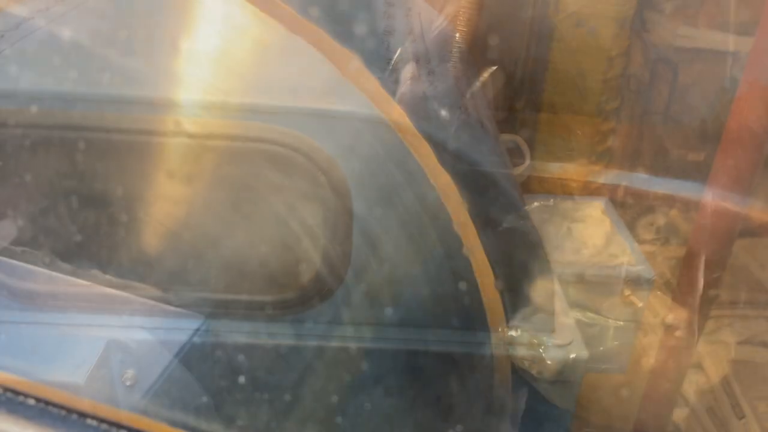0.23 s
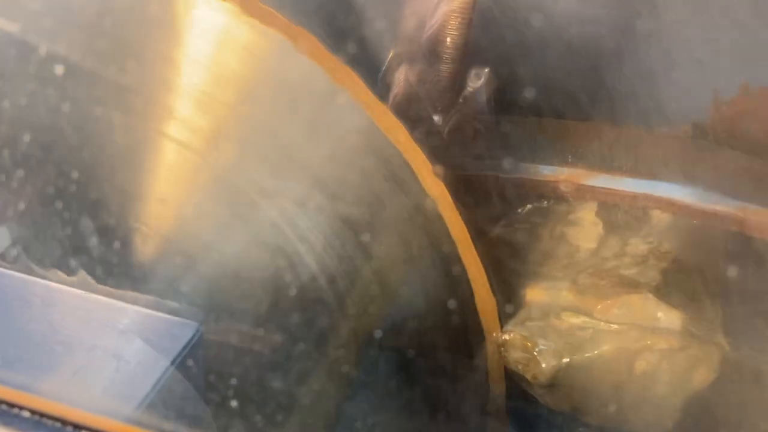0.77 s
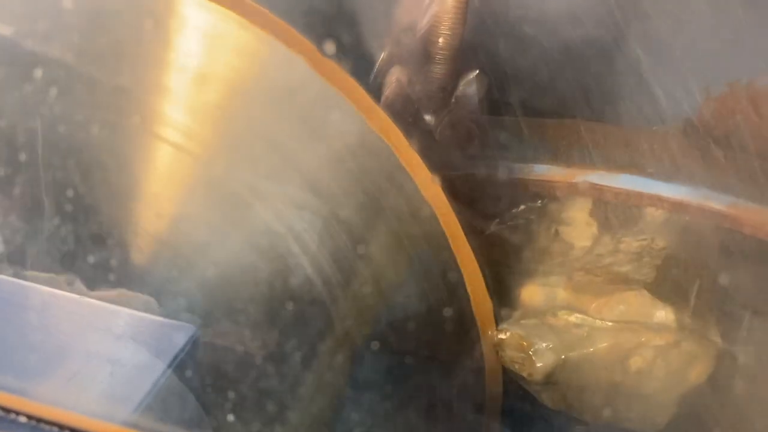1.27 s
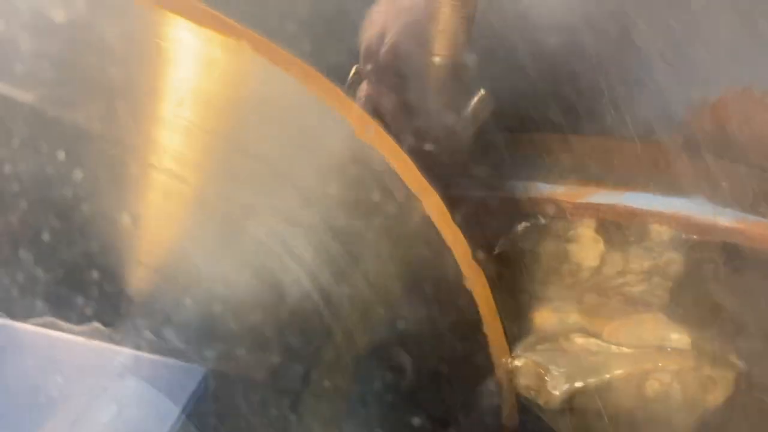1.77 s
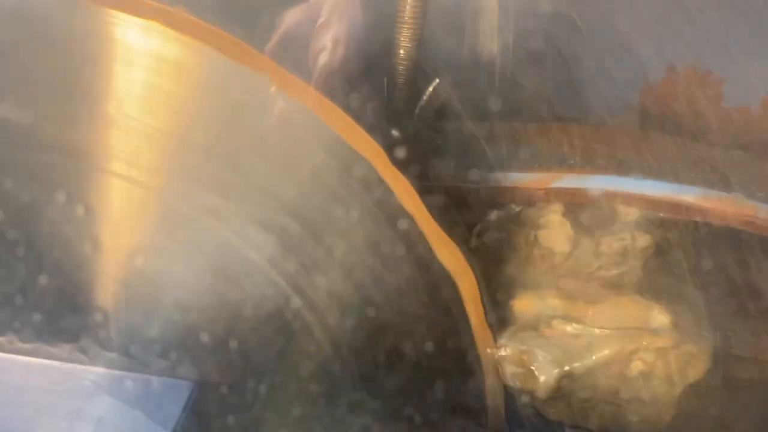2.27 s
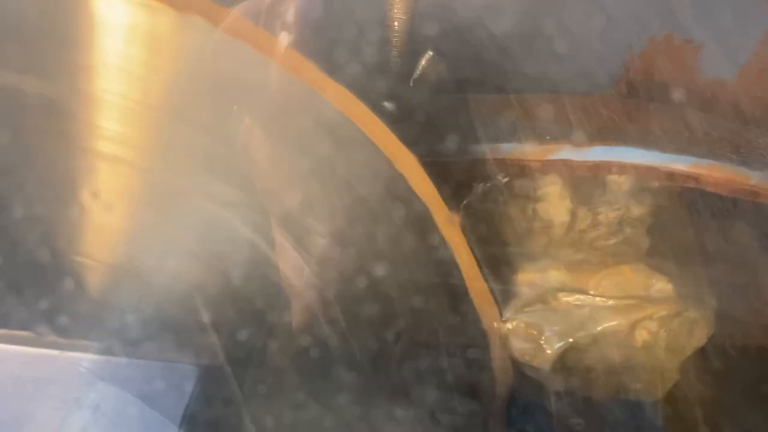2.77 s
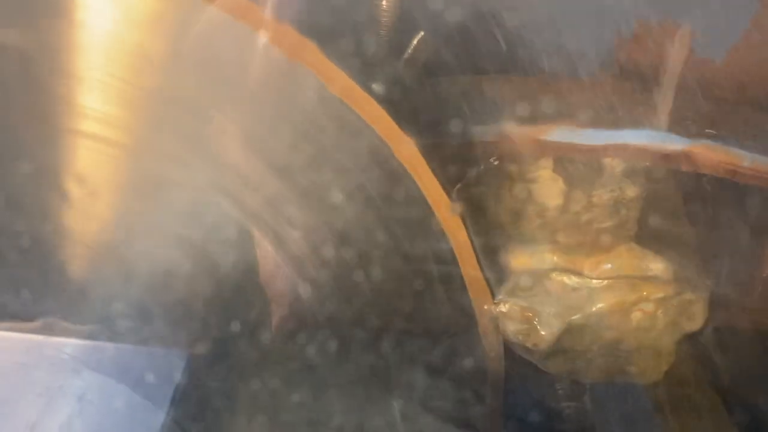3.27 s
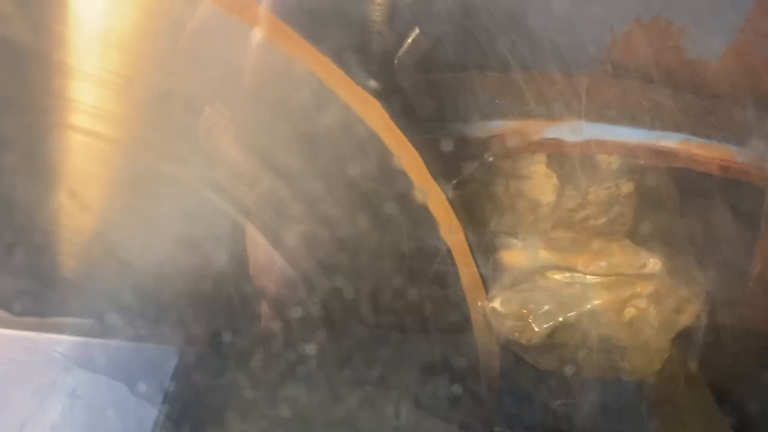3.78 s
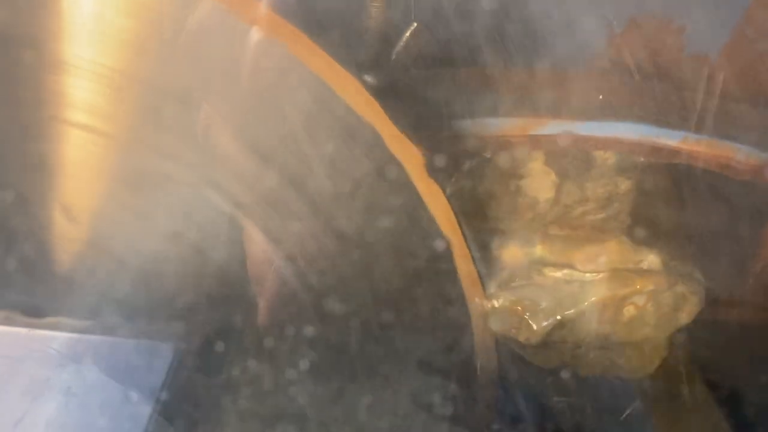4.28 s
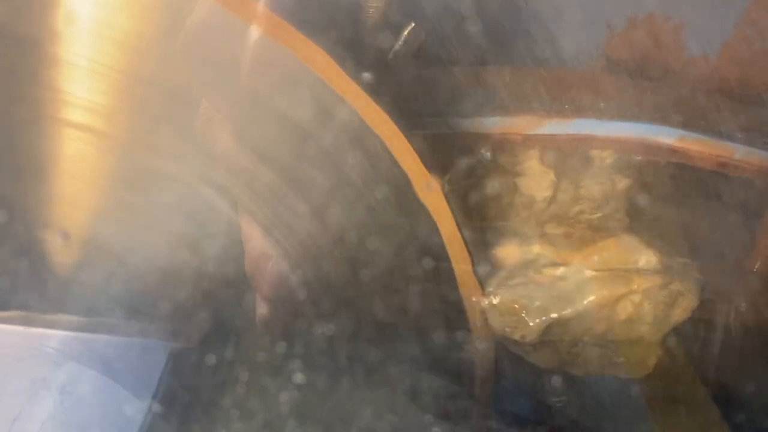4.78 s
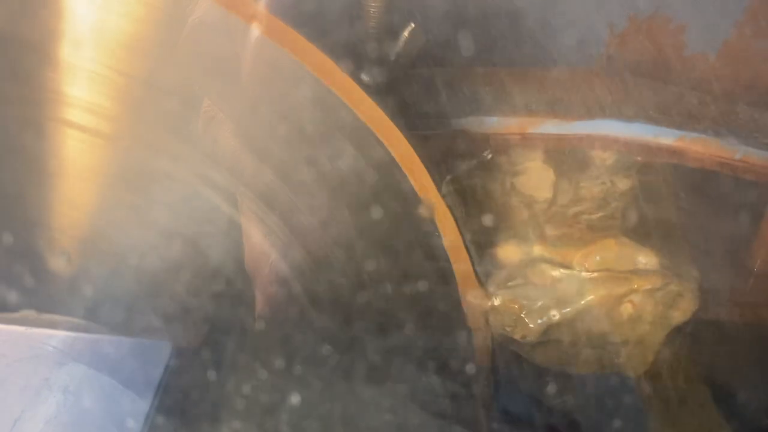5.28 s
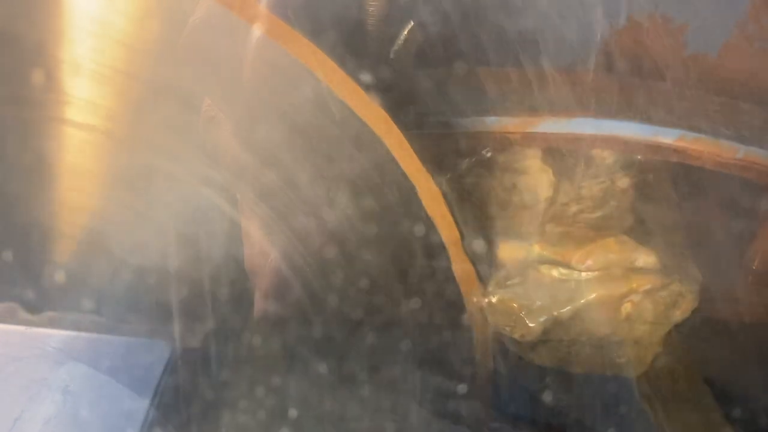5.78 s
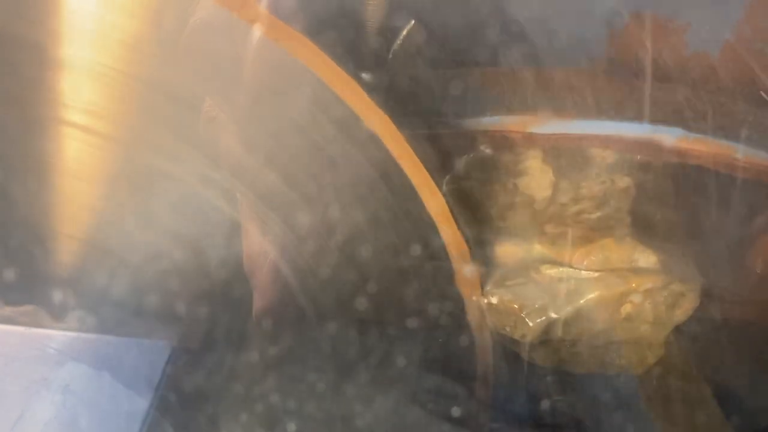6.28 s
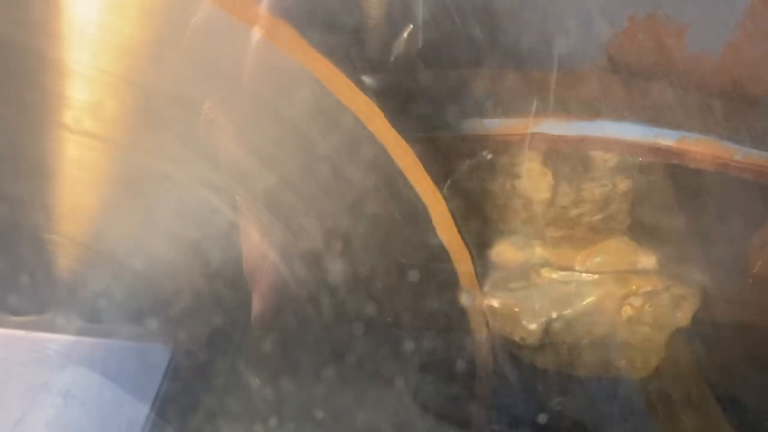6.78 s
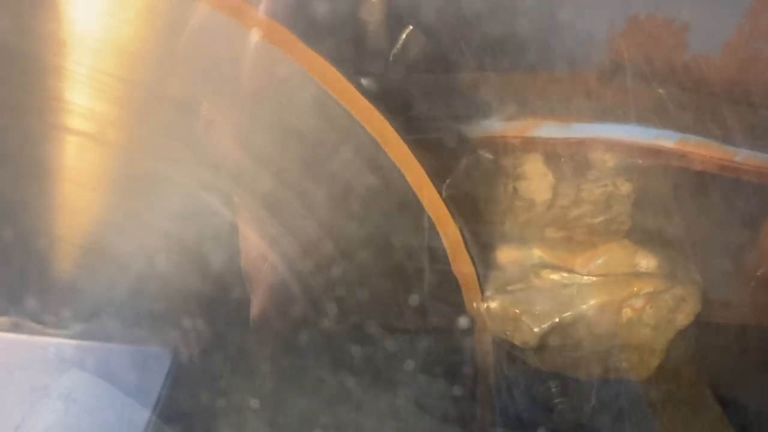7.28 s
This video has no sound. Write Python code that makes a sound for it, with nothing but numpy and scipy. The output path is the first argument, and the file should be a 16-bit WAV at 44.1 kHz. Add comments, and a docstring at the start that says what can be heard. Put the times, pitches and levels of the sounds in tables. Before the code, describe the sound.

An oil-cooled diamond saw grinds steadily through rock, with a throbbing motor hum, rumbling panels and a ringing hiss.

```python
"""Slab saw in a basement workshop

An oil-cooled diamond saw cuts a rock, miked close to its hood. Motors hum through the frame, the cabinet
throbs, the panels rumble and the hood booms with each belt lap. Grit on the rim grinds the stone and
rings the steel blade, swelling once a turn, and a few chips spit. Early on the microphone eases back,
then slides closer to the blade."""
import sys
import numpy as np
from scipy import signal
from scipy.fft import rfft, irfft, next_fast_len
from scipy.io import wavfile
from scipy.ndimage import uniform_filter1d

SR = 44100
rng = np.random.default_rng(int(sys.argv[2]) if len(sys.argv) > 2 else 0)


def master_out(mix):
    """Clip the mix to full scale and print it as 16-bit PCM to the path in sys.argv[1]."""
    frames = np.transpose(np.atleast_2d(mix))
    ceiling = np.clip(frames, -1, 1)
    pcm = np.round(ceiling * 32767).astype(np.int16)
    wavfile.write(sys.argv[1], SR, pcm)


N = 332073
TIME = np.arange(N) / SR
FFT_SIZE = next_fast_len(N, real=True)
FREQ = np.maximum(np.arange(FFT_SIZE // 2 + 1) * SR / FFT_SIZE, 1)
SIDES = np.array([[1], [-1]])  # left, right
BLADE_TURN_HZ, FEED_MOTOR_HZ, BELT_LAP_HZ = 16.486, 50.98, 1.527
BOOM_ORDER = 22  # the multiple of the blade's turn that sits on the hood's main resonance
# First moments at which the blade's high side meets the rock, its warp rubs the side of the cut
# and the belt's stiff spot meets the pulley.
HIGH_SIDE_S, WARP_S, BELT_TUG_S = 0.024, 0.0097, 0.52

# The microphone's path. Each row: time in seconds, nearness to the blade from 0 (far) to 1 (near).
MIC_NEARNESS = [(1.6, 0.5), (2.55, 0), (2.85, 1)]


def undb(db):
    """Decibels to gain."""
    return 10 ** (np.asarray(db) / 20)


def over_time(table):
    """A table of times and values, sample by sample."""
    seconds, values = np.transpose(table)
    return np.interp(TIME, seconds, values)


def over_frequency(table):
    """The columns of a frequency table, bin by bin."""
    hz, *columns = np.transpose(table)
    return [np.interp(np.log(FREQ), np.log(hz), column) for column in columns]


def colour(drive, response):
    """Filter a white drive by a response given as gain per Hz."""
    return irfft(rfft(drive, FFT_SIZE) * response, FFT_SIZE)[..., :N] * np.sqrt(SR / 2)


def walk(rate_hz):
    """Random levels held 1 / rate_hz seconds and smoothed twice; spread 1."""
    hold = int(SR / rate_hz)
    steps = np.repeat(rng.standard_normal(1024), hold)[:N]
    smooth = uniform_filter1d(uniform_filter1d(steps, hold), hold)
    return smooth / smooth.std()


def stereo(pan_db, lead):
    """Complex gains at the microphone's two ports: the left is pan_db louder and lead radians ahead."""
    gain = undb(SIDES * pan_db / 2)
    return gain / np.sqrt(np.mean(gain ** 2)) * np.exp(.5j * lead * SIDES)


def tone(hz, db, pan_db, lead, drift=0, neighbours=()):
    """A stereo sine, its phase drifting in radians; it swells when a neighbour falls in step with it."""
    beats = sum(undb(side_db) * np.exp(2j * np.pi * offset_hz * (TIME - swell_s))
                for offset_hz, side_db, swell_s in neighbours)
    phase = 2 * np.pi * (hz * TIME + rng.random()) + drift
    return np.sqrt(2) * np.real(stereo(pan_db, lead) * (undb(db) + beats) * np.exp(1j * phase))


def ringing(modes):
    """Stereo response of a body with these steep resonances."""
    response = np.zeros((2, len(FREQ)), complex)
    for hz, width, db, pan_db, lead in modes:
        near = abs(FREQ - hz) < 10 * width
        detune = hz / width * (FREQ[near] / hz - hz / FREQ[near])
        response[:, near] += undb(db) * stereo(pan_db, lead) / (1 + 1j * detune) ** 2
    return response


def rim_pressure(wobble_db, shake_db, uneven_db, warp_db=0., lag_s=0.):
    """The rim's push on the rock sways with its high side, its warp, the feed motor and uneven stone."""
    wobble = np.cos(2 * np.pi * BLADE_TURN_HZ * (TIME - lag_s - HIGH_SIDE_S))
    warp = np.cos(4 * np.pi * BLADE_TURN_HZ * (TIME - WARP_S))
    feed = 2 * np.pi * FEED_MOTOR_HZ * TIME
    shake = np.cos(feed) + .5 * np.cos(2 * feed)
    pressure = undb(wobble_db * wobble + warp_db * warp + shake_db * shake + uneven_db * walk(45))
    return pressure / np.sqrt(np.mean(pressure ** 2))


def grit(per_second, scatter_db):
    """Diamond grains strike the stone at random, a few of them hard; rms 1."""
    strikes = (rng.random(N) < per_second / SR) * rng.standard_normal(N)
    strikes *= undb(scatter_db * rng.standard_normal(N))
    return strikes / strikes.std()


def rasp(forces, per_second, scatter_db, crossovers_hz=(850, 2600, 7500)):
    """Grit whose four bands, from rumble to fine hiss, each follow their own force."""
    spectrum = rfft(grit(per_second, scatter_db), FFT_SIZE)
    band = np.searchsorted(crossovers_hz, FREQ)
    return sum(irfft(spectrum * (band == k), FFT_SIZE)[:N] * force for k, force in enumerate(forces))


def motor_hum(entry_db, waver_db=0.4):
    """Motors, mains and the shaken frame and hood hold steady pitches, each wavering a little in level."""
    # Each row: pitch in Hz, level in dB, left minus right in dB, left lead in radians.
    hum_tones = [(94.36, -43, 1, 0.1), (101.96, -29, 0, 0), (119.97, -29, -2.2, 0), (133.18, -37, -4, -0.4),
                 (142.16, -37.5, -5, -0.4), (147.73, -33.5, -5.3, -0.4), (152.94, -30.5, -6, -0.4),
                 (169.92, -42, -5.4, -0.6), (203.92, -38, -1.3, -0.2), (239.94, -40.5, 0.6, -0.1),
                 (254.2, -42.5, 3, 1.5), (305, -45, -7, -1), (511.1, -39.5, -2, -0.5), (613.7, -40, 3, 1.3)]
    return sum(tone(hz, db + entry_db + waver_db * walk(8.6), pan_db, lead)
               for hz, db, pan_db, lead in hum_tones)


def cabinet_drone():
    """The cabinet's deep drone, dead centre, throbs as the frame's tones beat with it."""
    # Each row: offset from the drone in Hz, level in dB, first swell in seconds.
    frame_tones = [(-4.698, -41, 0.161), (-2.141, -42, 0.22), (3.42, -41, 0.089), (5.544, -38, 0.173),
                   (7.437, -40.5, 0.037), (10.276, -41.5, 0.074)]
    return tone(hz=72.14, db=-29.5, pan_db=0, lead=0, drift=0.18 * walk(9), neighbours=frame_tones)


def hood_boom(entry_db, trim_db=-0.6, tug_db=1.57, wobble_db=2.0, uneven_db=0.5, lag_s=0.012):
    """The blade drives the hood's main resonance, which swells with each belt lap and blade turn."""
    # The boom surges and sinks. Each row: time in seconds, level in dB.
    surges = [(0.0, -24.5), (0.32, -22.0), (0.48, -19), (0.64, -26.5), (0.8, -21.5), (0.88, -23),
              (1.28, -21.0), (1.36, -30), (1.44, -19.5), (1.76, -28.5), (1.84, -18), (1.92, -34),
              (2.0, -16.5), (2.24, -28.5), (2.4, -20.0), (2.72, -21.5), (2.96, -18), (3.12, -15.5),
              (3.2, -21.5), (3.44, -16), (3.52, -22), (3.6, -18.5), (3.77, -20.5), (4.01, -19.5),
              (4.09, -16), (4.25, -19.5), (4.41, -25.5), (4.49, -17.5), (4.57, -23.5), (4.73, -18.5),
              (4.81, -22.5), (5.05, -20.5), (5.13, -23.0), (5.21, -17), (5.29, -32), (5.37, -17),
              (5.53, -24), (5.61, -16.5), (5.85, -23.0), (5.93, -21.5), (6.01, -31), (6.17, -18),
              (6.25, -16), (6.41, -23.5), (6.65, -20), (6.97, -29), (7.05, -17.5), (7.13, -32),
              (7.21, -17.5), (7.29, -33.5), (7.45, -10.5), (7.53, -38)]
    # Feed motor and frame overtones that beat with the boom.
    # Each row: offset from the boom in Hz, level against it in dB, first swell in seconds.
    overtones = [(-5.76, -9, 0.068), (5.52, -15, 0.089), (10.71, -12, 0.024)]
    lap = 2 * np.pi * BELT_LAP_HZ * (TIME - BELT_TUG_S)
    turn = 2 * np.pi * BLADE_TURN_HZ * (TIME - HIGH_SIDE_S - lag_s)
    swell_db = tug_db * (np.cos(lap) + np.cos(2 * lap)) + wobble_db * np.cos(turn) + uneven_db * walk(27)
    boom = tone(BOOM_ORDER * BLADE_TURN_HZ, db=0, pan_db=4.5, lead=0.24,
                drift=0.13 * walk(22), neighbours=overtones)
    return boom * undb(entry_db + trim_db + over_time(surges) + swell_db)


def shaking(bump_share=0.14):
    """Grinding force on the machine: fresh grit, plus rim bumps that come round on every turn."""
    turn_samples = round(SR / BLADE_TURN_HZ)
    harmonics = rfft(rng.standard_normal(turn_samples))
    harmonics[BOOM_ORDER] = 0  # this one sounds as the hood's boom
    bumps = np.resize(irfft(harmonics, turn_samples), N)
    force = np.sqrt(bump_share) * bumps + np.sqrt(1 - bump_share) * grit(per_second=9000, scatter_db=1.0)
    return force * rim_pressure(wobble_db=0.5, shake_db=-0.4, uneven_db=-0.5)


def panel_rumble(rumble_db, small_from_hz=480):
    """The cut shakes the sheet panels of cabinet and hood; the small, higher ones swell on their own."""
    # Each row: resonance in Hz, width in Hz, level in dB, left minus right in dB, left lead in radians.
    panel_modes = [(70, 25, -54, -2, 0.13), (104.3, 32, -46.5, 2, 0.72), (135.8, 44, -46.5, -8, -0.78),
                   (344.4, 23.7, -41, 7.5, 0.59), (370.8, 26.3, -45.5, 1, -1.3), (398, 5.8, -45.5, 3, 0.14),
                   (447, 6.9, -47, -18, 1.8), (516, 85, -48, -2, 0.92), (615, 20.5, -43, 4, 1.52),
                   (653.7, 27, -44.5, 10, 0.78), (749.7, 30.5, -49, -2, 0.2), (830, 170, -62, -7, -0.11),
                   (934, 13, -53, -4.5, 1.43), (968.6, 25, -57.5, 13, -0.22), (1015, 9.7, -51.5, 5, 2.2)]
    # Each row: time in seconds, level of the small panels against the large in dB.
    small_panel_levels = [(0, 0.5), (0.7, 2), (0.8, 0.5), (0.95, -2.5), (1.15, 0), (1.35, 1.5), (1.52, 3.5),
                          (1.65, -2), (1.9, 2.5), (2.4, 0), (2.8, 0.5), (3.4, -0.5), (3.95, 2), (4.6, -0.5),
                          (5.2, -0.5), (5.9, 0), (6.55, 2), (6.9, -0.5), (7.15, 2), (7.53, -4)]
    swell = undb(over_time(small_panel_levels))
    rumble = np.zeros((2, N))
    # Neighbouring resonances belong to different panels, shaken separately.
    for modes in (panel_modes[0::2], panel_modes[1::2]):
        force = shaking() * undb(rumble_db)
        rumble += colour(force, ringing(mode for mode in modes if mode[0] < small_from_hz))
        rumble += colour(force * swell, ringing(mode for mode in modes if mode[0] >= small_from_hz))
    return rumble


def singing_panel(trim_db=-0.5):
    """One lightly damped panel sings over the rest, its pitch never quite still."""
    # Each row: time in seconds, level in dB.
    levels = [(0.0, -39), (0.17, -33), (1.42, -35), (1.74, -33), (1.8, -56), (1.84, -31.5), (3.48, -34),
              (3.63, -25), (3.75, -39), (4.86, -33.5), (4.91, -22), (4.99, -38), (5.49, -27), (5.6, -40),
              (5.81, -26), (5.93, -45), (6.0, -26), (6.17, -40), (6.21, -29), (6.42, -34), (6.69, -24),
              (6.8, -38), (6.86, -26), (7.0, -37), (7.17, -26.5), (7.53, -33)]
    return tone(hz=750.0, db=over_time(levels) + trim_db, pan_db=2.0, lead=0.15, drift=1.6 * walk(26))


def chips(decay_s=0.009, trim_db=-16):
    """Soft spits of hiss as bits of stone break away in the oil."""
    # Each row: start in seconds, level in dB.
    breaks = [(3.284, -20), (5.2789, -21), (5.6575, -20)]
    envelope = np.zeros(N)
    for start_s, db in breaks:
        start = int(start_s * SR)
        age = TIME[:N - start]
        envelope[start:] += undb(db + trim_db) * np.exp(-np.minimum(age / decay_s, 20))
    highpass = signal.butter(2, 9000, "high", fs=SR, output="sos")
    return signal.sosfilt(highpass, envelope * rng.standard_normal((2, N)))


def spray_wash(forces, ripple_db=5.0, ripple_from_hz=3000):
    """A broad wash of grinding and oil spray; reflections in the hood ripple its treble."""
    # Each row: frequency in Hz, level in dB.
    wash_spectrum = [(30, -78), (48, -63.5), (70, -54), (150, -49), (280, -57), (420, -49.5), (600, -57.5),
                     (700, -60.5), (850, -59.5), (1100, -63), (1700, -73), (2500, -72.5), (4600, -77.5),
                     (7000, -84), (8200, -82), (9500, -87.5), (11500, -75.5), (13100, -85), (14000, -80),
                     (15800, -78)]
    # The wash at the two ports. Each row: frequency in Hz, likeness from 0 to 1, left lead in radians.
    stereo_image = [(60, .99, 0), (170, .97, -0.4), (265, 0.7, 0.6), (370, 0.85, 0.3), (640, 0.35, 0.9),
                    (1000, 0.32, 0), (2830, 0.25, 0.4), (7000, 0.55, 0), (8000, .5, -1.3),
                    (9000, .75, -3.1), (10700, 0.9, -6.2), (12200, .75, -6.6), (13100, .75, -9.4),
                    (14700, .95, -12.4)]
    wash_db, = over_frequency(wash_spectrum)
    likeness, lead = over_frequency(stereo_image)
    mid_drive, side_drive = (rasp(forces, per_second=36000, scatter_db=1.6) for _ in range(2))
    ripple = np.interp(FREQ, np.linspace(0, SR / 2, 400), rng.standard_normal(400))
    treble = FREQ ** 2 / (FREQ ** 2 + ripple_from_hz ** 2)
    response = undb(wash_db + ripple_db * ripple * treble) * np.exp(.5j * lead * SIDES)
    mid = colour(mid_drive, response * np.sqrt((1 + likeness) / 2))
    side = colour(side_drive, response * np.sqrt((1 - likeness) / 2))
    return mid + SIDES * side


def blade_ring(forces, shift_db=1.36, whine_hz=3345):
    """As the contact shifts, families of the steel blade's resonances come forward; the purest whines."""
    # Each row: resonance in Hz, width in Hz, level in dB, left minus right in dB, left lead in radians.
    blade_modes = [(1303, 71, -74.5, 16, 1.5), (1447, 64, -57.5, 2, 2.5), (1556, 110, -64.5, -3.5, 4),
                   (1912, 97, -61.5, -0.5, -1.4), (2081, 100, -60.5, 0.5, -1), (2208, 98, -60.5, -2, 1.9),
                   (2352, 120, -69, -2, -2.5), (2462, 160, -71, 11, 2.5), (2617, 29, -66, 13, 4.5),
                   (2825, 77, -67.5, -2, -2.5), (3004, 21, -63, 10, 2), (3087, 38, -69.5, 4, 1.5),
                   (3237, 73, -77, 8, -1.5), (3337, 28, -62.5, 9, 1), (3430, 129, -79, 10, 3.5),
                   (3620, 160, -75.5, 0, -0.5), (3740, 70, -66.5, -4, 0.5), (3850, 36, -65.5, 1, -1.5),
                   (4050, 74, -75, 0, 1.5), (4205, 42, -71, 2, -0.7), (4405, 51, -72, 1, -1.7),
                   (4600, 110, -77, 6, -3.4), (4845, 33, -70, -2, -4.8), (5009, 130, -86, 0, 1.5),
                   (5162, 59, -73, -3, 0), (5380, 93, -82, -5, 0), (5520, 71, -71.5, -2, 1.0),
                   (5640, 110, -74, -2, 1.5), (5862, 29, -71.5, -1, 0.7), (6000, 28, -74.5, -2, -1.0),
                   (6372, 38, -87, -1, 1), (7450, 130, -79, 0, 1.5), (10210, 420, -73.5, 2, 2.3),
                   (10620, 180, -71, -2, 0.5), (11010, 220, -69, 0, 1), (13830, 140, -76, 0, -10),
                   (14053, 170, -61, 0, -2.5), (14252, 150, -70, 0, -0.5), (14760, 170, -76, 0, -7),
                   (15130, 170, -73, 0, -11), (15670, 130, -60, 0, 1)]
    # How strongly the cut rings the blade. Each row: time in seconds, gain in dB.
    ring_levels = [(0, -1), (0.9, 0), (1.7, 0.5), (2.5, 1.6), (3.1, 1.1), (4.0, 0.5), (4.8, 0.8),
                   (5.4, 0.6), (6.4, -0.5), (7.0, 0), (7.53, 1.2)]
    # Each row: time in seconds, level of the whine against the other resonances in dB.
    whine_levels = [(0, 6), (0.8, -5), (1.5, 4), (2.5, -1), (3.4, 1), (4.1, 1), (4.6, 2), (5.3, 2),
                    (5.9, 0), (6.4, 4.5), (6.85, -1), (7.53, -4)]
    whine_modes = [mode for mode in blade_modes if abs(mode[0] - whine_hz) < mode[1] / 2]
    families = [[mode for mode in blade_modes[k::3] if mode not in whine_modes] for k in range(3)]
    drives = [rasp(forces, per_second=32000, scatter_db=1.4) * undb(shift_db * walk(24)) for _ in families]
    ring = sum(colour(drive, ringing(modes)) for drive, modes in zip(drives, families))
    whine = colour(drives[0] * undb(over_time(whine_levels)), ringing(whine_modes))
    return (ring + whine) * undb(over_time(ring_levels))


def hard_spots(rest_db=-0.2, half_width_s=0.018):
    """Gain of the scrape: it surges briefly where the rim meets a hard spot in the stone."""
    # Each row: time in seconds, rise in dB.
    spots = [(1.505, 2), (2.285, 3.5), (2.355, 3.5), (2.92, 1.5), (3.14, 2.5), (3.47, 1.5), (4.745, 5.5),
             (5.03, 0), (7.08, 4), (7.4, 1)]
    surge_db = sum(db * np.exp(-((TIME - at_s) / half_width_s) ** 2) for at_s, db in spots)
    return undb(rest_db + surge_db)


def grinding(rumble_db, bite_db, hiss_db):
    """Grit raises a wash and rings the blade, swelling each turn; the colour shifts with mic distance."""
    # Colour at the microphone's farthest point. Each row: frequency in Hz, gain in dB.
    far_colour = [(1500, 1), (3100, 1), (3600, -2), (4400, 3), (5100, 3), (5700, -4.5), (6700, 6.5),
                  (7900, -1), (9800, 6.5), (11000, -0.5), (12400, 2.5), (13700, 1), (14800, 2), (15700, -5)]
    scrape = rim_pressure(wobble_db=1.0, shake_db=0.9, uneven_db=1.0, warp_db=0.5, lag_s=-0.011)
    sizzle = rim_pressure(wobble_db=1.2, shake_db=0.2, uneven_db=0.74, warp_db=0.3, lag_s=-0.0018)
    hiss = rim_pressure(wobble_db=1.6, shake_db=0.45, uneven_db=1.0, warp_db=1.0, lag_s=-0.0013)
    bite = undb(bite_db)
    forces = [undb(rumble_db), bite * hard_spots() * scrape, bite * sizzle, undb(hiss_db) * hiss]
    close = spray_wash(forces) + blade_ring(forces)
    far_db, = over_frequency(far_colour)
    distant = colour(close, undb(far_db) / np.sqrt(SR / 2))
    nearness = over_time(MIC_NEARNESS)
    return nearness * close + (1 - nearness) * distant


def scene(start_db=-3.5, fade_s=0.35, hardness_db=0.03, far_bite_db=-2, far_hiss_db=-3):
    """The sound fades in quickly, the saw already cutting; uneven stone faintly sways the grinding."""
    # How hard the rock presses on the blade and shakes the panels. Each row: time in seconds, gain in dB.
    rock_load = [(0, -0.5), (1.4, 0.5), (2.2, -1), (3.0, 0.3), (4.0, 1), (5.0, 1.3), (6.1, 0), (6.6, 0.5),
                 (7.53, 0.5)]
    entry_db = start_db * np.clip(1 - TIME / fade_s, 0, 1)
    farness = 1 - over_time(MIC_NEARNESS)
    rumble_db = entry_db + over_time(rock_load)
    bite_db = entry_db + hardness_db * walk(13) + far_bite_db * farness
    hiss_db = entry_db + hardness_db * walk(17) + far_hiss_db * farness
    machine = motor_hum(entry_db) + hood_boom(entry_db) + cabinet_drone()
    panels = panel_rumble(rumble_db) + singing_panel()
    return machine + panels + grinding(rumble_db, bite_db, hiss_db) + chips()


def record(dry, ceiling=0.75, top_hz=15740):
    """The recorder rounds the loudest peaks and cuts the top steeply."""
    rounded = dry / (1 + (dry / ceiling) ** 6) ** (1 / 6)
    lowpass = signal.ellip(12, .1, 80, top_hz, fs=SR, output="sos")
    return signal.sosfilt(lowpass, rounded)


dry = scene()
out = record(dry)
master_out(out)
```